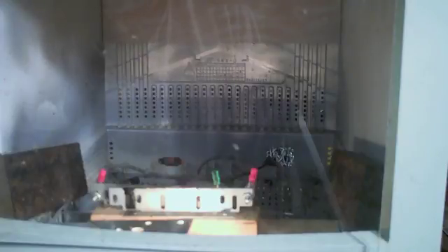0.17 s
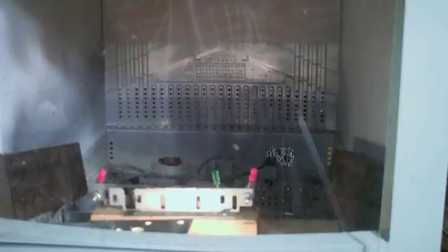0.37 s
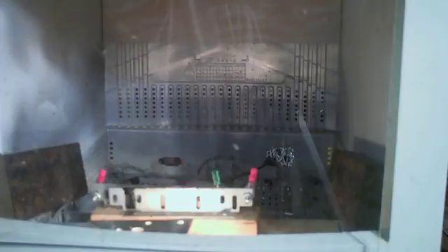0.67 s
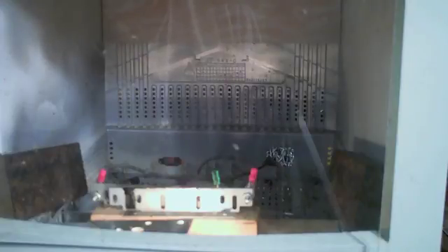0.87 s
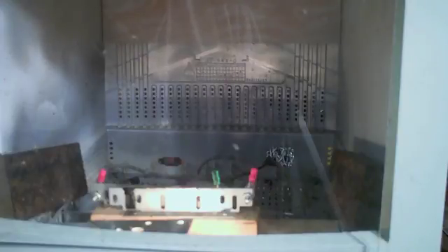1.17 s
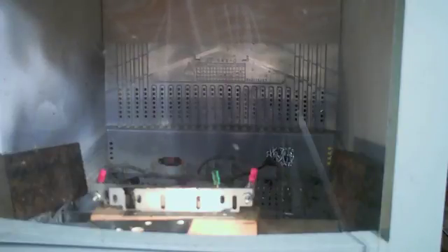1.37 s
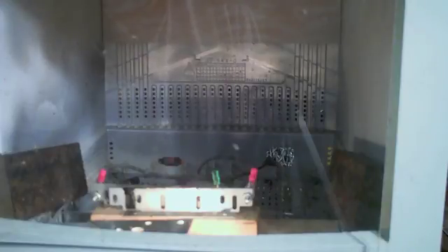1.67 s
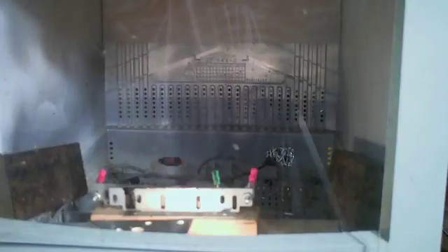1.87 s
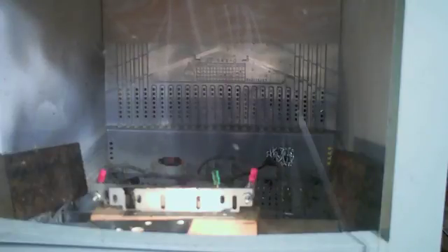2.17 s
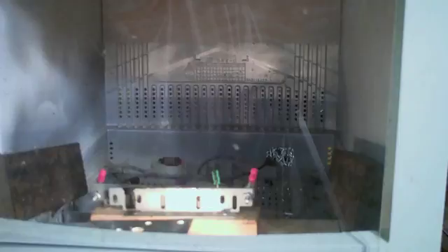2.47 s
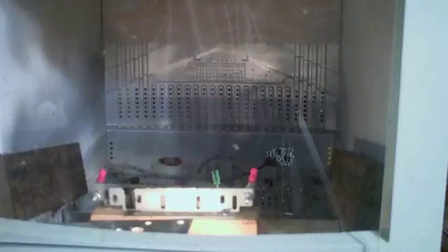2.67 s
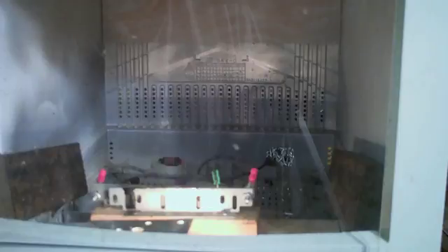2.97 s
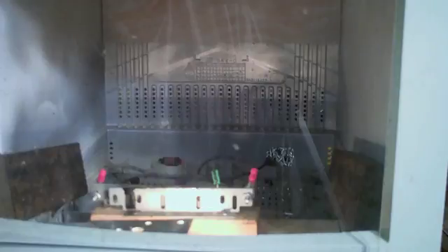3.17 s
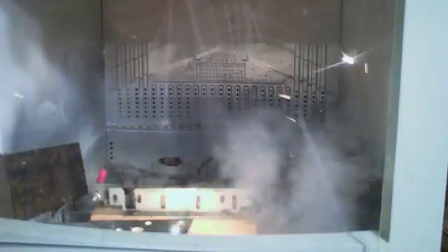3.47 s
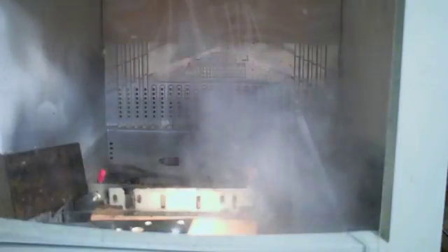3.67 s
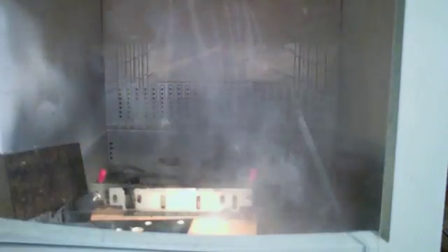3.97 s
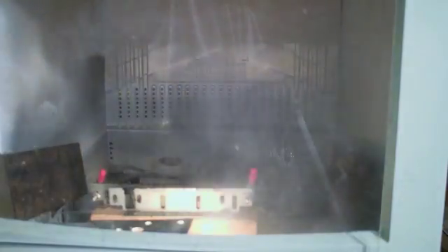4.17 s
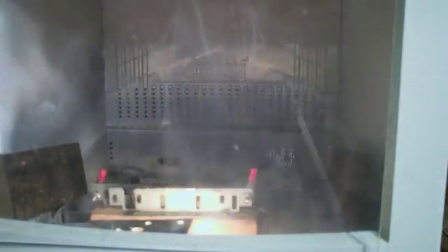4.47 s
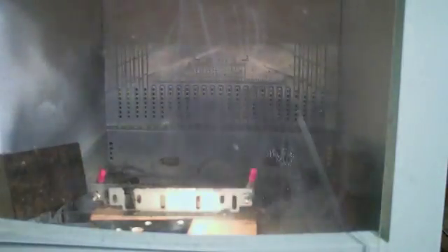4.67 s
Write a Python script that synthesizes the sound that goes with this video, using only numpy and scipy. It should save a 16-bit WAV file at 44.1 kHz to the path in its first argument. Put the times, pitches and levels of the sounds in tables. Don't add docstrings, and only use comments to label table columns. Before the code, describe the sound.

From 0 to 3.37 seconds there is only a quiet, steady background: low mains hum, two fan shafts beating slowly against each other, a faint unsteady motor whine and soft, dull air rush. At about 3.38 seconds, after a few milliseconds of rattle through the metal, a small capacitor bursts with one very loud, sharp crack that softly overloads the microphone. Rapid gas puffs merge into it, sheet-metal panels ring, and the door thuds back hard at 3.42. The boxy reverberation dies within about a third of a second, with a fainter workshop tail. A thin shard pings high near 3.48; from 3.65 to 3.8 fragments clink on a metal tray and the empty can drops and skitters on the bench. A very faint fizz swells around 4.2 and fades, while a loose clip ticks lightly from 4.15 to 4.4. The hum and airflow then continue alone until 5 seconds.

```python
import sys
import numpy as np
from scipy import signal
from scipy.fft import rfft, irfft, next_fast_len
from scipy.io import wavfile
from scipy.ndimage import uniform_filter1d

SR = 44100
rng = np.random.default_rng(int(sys.argv[2]) if len(sys.argv) > 2 else 0)


def int16_out(signal):
    q = np.round(np.clip(np.atleast_2d(signal).T, -1, 1) * 32767)
    wavfile.write(sys.argv[1], SR, q.astype(np.int16))


def magnitude_from_level(level_db):
    exponent = np.asarray(level_db, float) / 20
    return 10 ** exponent


N = 212804
TIME = np.arange(N) / SR
BLAST = TIME[int(3.3 * SR):int(4.1 * SR)]
SHAFT_HZ, SHOCK_S = 29.545, 3.3781


def level(x, db):
    return x * magnitude_from_level(db) / np.sqrt(np.mean(x ** 2))


def shape(x, gain):
    size = next_fast_len(len(x))
    hz = np.maximum(np.arange(size // 2 + 1) * SR / size, 1)
    return irfft(rfft(x, size) * gain(hz), size)[:len(x)]


def low_cut(x):
    return shape(x, lambda hz: 1 / (1 + (230 / hz) ** 4))


def on_log(points, hz):
    f, v = np.transpose(points)
    return np.interp(np.log(hz), np.log(f), v)


def walk(rate_hz):
    k = int(SR / rate_hz)
    steps = np.repeat(rng.standard_normal(N // k + 1), k)
    smooth = uniform_filter1d(uniform_filter1d(steps, k), k)
    return level(smooth[:N], 0)


def ring(modes, start_rad=0):
    hz, db, t60_s = np.transpose(modes)[:, :, None]
    t = TIME[:SR // 3]
    return np.sum(magnitude_from_level(db - 60 * t / t60_s) * np.sin(2 * np.pi * hz * t + start_rad), axis=0)


def reverb(scale=1):
    # pitch_hz, t60_s
    box_t60 = [(100, .15), (250, 0.23), (700, 0.3), (1400, 0.29), (3000, .255), (6000, 0.21), (12000, .185),
               (14800, .05)]
    t, out = TIME[:SR // 2], 0
    noise = rng.standard_normal(len(t))
    for centre in 60 * 2 ** np.arange(0, 8.6, .5):
        band = shape(noise, lambda hz: np.cos(np.pi * np.clip(np.log2(hz / centre), -.5, .5)) ** 2)
        t60_s = scale * on_log(box_t60, centre)
        out = out + band * magnitude_from_level(-60 * t / t60_s) * np.sqrt(2 * np.log(1000) / t60_s / SR)
    return out


def hum():
    # mains_order, shaft1_order, shaft2_order, level_db (rms)
    tones = [(0, 1, 0, -50.4), (0, 0, 1, -55.7), (0, 3, 0, -71), (2, 0, 0, -44.1), (2, 1, 0, -65),
             (2, 2, 0, -65), (4, -1, 0, -68), (4, 0, 0, -49.5), (4, 0, 1, -61), (6, 0, 0, -65.5),
             (10, 0, 0, -69)]
    mains_hz, shaft2_hz, beat_peak_s = 59.988, 28.225, 1.715
    t, sway = TIME - beat_peak_s, walk(0.86)
    out = 0
    for m, a, b, db in tones:
        hz = m * mains_hz + a * SHAFT_HZ + b * shaft2_hz
        lead_rad = np.pi / 4 * max(m - 2, 0)
        out = out + magnitude_from_level(db + 0.12 * sway) * np.sqrt(2) * np.cos(2 * np.pi * hz * t + lead_rad)
    return out


def air_rush():
    # pitch_hz, density_db (per Hz)
    air = [(15, -14.5), (45, -22), (75, -18.5), (100, -17), (200, -14), (300, -14), (453, -16.5),
           (881, -21), (1500, -24), (2250, -37.5), (4200, -44), (5500, -51), (12700, -62.5), (13000, -83.5)]
    rush, swell = 0, walk(0.68)
    for centre in 20 * 2 ** np.arange(0, 10):
        def octave(hz):
            return magnitude_from_level(on_log(air, hz)) * np.cos(np.pi / 2 * np.clip(np.log2(hz / centre), -1, 1))
        band = shape(rng.standard_normal(N), octave)
        rush = rush + band * magnitude_from_level(.35 * swell + .6 * walk(12))
    return level(rush, -52.5)


def whine():
    # pitch_hz, width_hz, level_db (rms)
    blades = [(288, 11, -60), (308, 8, -61), (340.2, 40, -63.5), (348.6, 6.6, -67), (390, 6.5, -66),
              (409, 14, -66), (491, 3, -67), (590, 3, -66), (605, 17, -62.5), (635.6, 4, -66),
              (727, 50, -66), (1280, 16, -68.5), (1280, 170, -69), (3910, 160, -84.5), (11800, 160, -97)]

    def peaks(hz):
        power = 0
        for f, w, db in blades:
            power = power + magnitude_from_level(db) ** 2 * 2 * SR / (np.pi * w) / (1 + (2 * (hz - f) / w) ** 2) ** 2
        return np.sqrt(power)
    return shape(rng.standard_normal(N), peaks)


def rotor_slots():
    # centre_hz, level_db (rms)
    slots = [(3941.5, -91), (11823, -97)]
    # pitch_hz, level_db (rms)
    coils = [(2702, -90), (7882, -98), (8348, -104)]
    outer_db = -6
    lines = list(coils)
    for hz, db in slots:
        for k in np.arange(4) - 1.5:
            lines.append((hz + k * SHAFT_HZ, db + (abs(k) > 1) * outer_db))
    clock_s = TIME + np.cumsum(0.00027 * walk(18)) / SR
    return sum(magnitude_from_level(db + 1.2 * walk(15)) * np.sqrt(2) * np.cos(2 * np.pi * hz * clock_s) for hz, db in lines)


def smoke():
    start_s, peak_s, hold_s = 3.6, 4.2, .17
    peak_db, rest_db, rise_db_s, fall_db_s = -66, -80, 45, 90

    def colour(hz):
        return (1 / (1 + (np.log2(hz / 1700) / 0.75) ** 4) + .075) / (1 + (hz / 11000) ** 8)
    fizz = level(shape(rng.standard_normal(N), colour), 0)
    before_db = rise_db_s * (peak_s - TIME)
    after_db = fall_db_s * (TIME - peak_s - hold_s)
    swell_db = peak_db - np.maximum(0, np.maximum(before_db, after_db))
    flutter_db = 1.2 * walk(25)
    return fizz * (TIME > start_s) * magnitude_from_level(np.maximum(swell_db, rest_db) + flutter_db)


def debris(landings, modes, crack_db, crack_hz, octaves, contact_s, tail, uneven_rad):
    def crack(hz):
        return 1 / (1 + (np.log2(hz / crack_hz) / octaves) ** 4) / (1 + (hz / 12800) ** 20)
    out = np.zeros(N + SR)
    echo = shape(reverb(tail), crack)
    t = TIME[:SR // 3]
    for s, db, hold_s in landings:
        response = ring(modes, uneven_rad * rng.standard_normal((len(modes), 1)))
        build_up = 1 - np.exp(-t / contact_s)
        damping = np.exp(-np.clip(t - hold_s, 0, None) / 0.0058)
        at = int(s * SR)
        out[at:at + len(t)] += magnitude_from_level(db) * (response * build_up * damping + magnitude_from_level(crack_db) * echo[:len(t)])
    return out[:N]


def held(hits, hold_s):
    return [(s, db, hold_s) for s, db in hits]


def loose_clip():
    # pitch_hz, level_db, t60_s
    clip_modes = [(4280, 2, 0.065), (4350, 0.5, .1), (4470, -3, .06), (1600, 0, 0.055), (2800, -7, .06),
                  (8900, -18, 0.0196)]
    # start_s, level_db
    rattles = [(4.15, -72), (4.199, -62), (4.235, -61), (4.250, -58), (4.297, -68), (4.334, -64),
               (4.38, -71)]
    return debris(held(rattles, .008), clip_modes, crack_db=11, crack_hz=6700, octaves=0.66,
                  contact_s=.0015, tail=.15, uneven_rad=.3)


def bench():
    # pitch_hz, level_db, t60_s
    bench_modes = [(2460, -7, .05), (3140, -3, .04), (4070, 0, .06), (4190, -3, .08)]
    # start_s, level_db
    skitters = [
        (3.660, -50),
        (3.667, -55),
        (3.69, -64),
        (3.715, -67),
    ]
    # start_s, level_db
    pings = [(3.650, -60), (3.764, -60)]
    can = debris(held(skitters, .1), bench_modes, crack_db=47, crack_hz=1450, octaves=1.03,
                 contact_s=.0005, tail=0.55, uneven_rad=1.0)
    bits = debris(held(pings, .025), bench_modes, crack_db=14, crack_hz=3000, octaves=1.22,
                  contact_s=.0005, tail=0.3, uneven_rad=1.0)
    return can + bits


def tray():
    # pitch_hz, level_db, t60_s
    tray_modes = [(1126, -12, .3), (1156, 0, .36), (1187, -4, .3), (1215, -10, .2), (2620, -24, .2)]
    # start_s, level_db, hold_s (until damped)
    hits = [(3.651, -36, .065), (3.731, -51, .014), (3.764, -42, .027), (3.798, -43.5, .029)]
    return debris(hits, tray_modes, crack_db=10, crack_hz=2000, octaves=0.98,
                  contact_s=.003, tail=0.64, uneven_rad=0.41)


def shard():
    # pitch_hz, level_db, t60_s
    shard_modes = [(4390, -5, .12), (4430, 2, .12), (5100, -3, .2), (5160, -6, .15), (8700, -12, .05),
                   (10700, -16, .1), (11620, -1, .05)]
    # start_s, level_db, hold_s (until damped)
    hits = [(3.479, -41, .08)]
    return debris(hits, shard_modes, crack_db=15, crack_hz=6000, octaves=1.1,
                  contact_s=0.00083, tail=.6, uneven_rad=.8)


def heave():
    # pitch_hz, level_db, t60_s
    air_modes = [(82, -6, .15), (150, 0, .15)]
    # start_s, level_db, hold_s (until damped)
    pushes = [(3.384, -21, .034)]
    return debris(pushes, air_modes, crack_db=-40, crack_hz=450, octaves=1.1,
                  contact_s=.015, tail=0.6, uneven_rad=0.4)


def door():
    # pitch_hz, level_db, t60_s
    door_modes = [(266, 3.5, .16), (288.2, -2, 0.15), (710, -5, 0.13)]
    # start_s, level_db, hold_s (until damped)
    knocks = [
        (3.378, -20, .044),
        (3.422, -13, .021),
        (3.447, -25.5, .028),
        (3.490, -31.5, .02),
    ]
    return debris(knocks, door_modes, crack_db=-12, crack_hz=450, octaves=1.1,
                  contact_s=.004, tail=0.62, uneven_rad=0.43)


def forerunner():
    start_s, peak_db = 3.3732, -22
    u = np.clip((TIME - start_s) / (SHOCK_S - start_s), 0, 1)
    rattle = shape(rng.standard_normal(N), lambda hz: 1 / np.sqrt(1 + (hz / 4000) ** 2))
    rising_tone = 1.2 * np.sin(2 * np.pi * u ** 1.4)
    return low_cut(magnitude_from_level(peak_db) * u * (u < 1) * (rattle + rising_tone))


def shock_front():
    length_s, peak_db = 0.0014, 2
    u = (BLAST - SHOCK_S) / length_s
    return low_cut(magnitude_from_level(peak_db) * np.where((u > 0) & (u < 1), np.sin(2 * np.pi * u), 0))


def gas_and_thuds():
    # start_s, level_db
    thuds = [(3.421, -14), (3.507, -37.5)]
    gusts, first_s, gap_s, first_db, drop_db = 3, 3.3791, .011, -10, 2.5
    # start_s, level_db, length_s, bright_hz
    puffs = [(first_s + k * gap_s, first_db - k * drop_db, .011, 11000) for k in range(gusts)]
    puffs += [(s, db, .0064, 1300) for s, db in thuds]
    gas = 0
    for s, db, length_s, bright_hz in puffs:
        u = np.clip((BLAST - s) / length_s, 0, None)
        noise = shape(rng.standard_normal(len(u)), lambda hz: 1 / np.sqrt(1 + (hz / bright_hz) ** 2))
        gas = gas + magnitude_from_level(db) * (u > 0) * np.exp(-u) * noise
    return gas


def bang():
    # pitch_hz, density_db (per Hz)
    colour = [(70, -24.5), (200, -26), (273, -6), (466, -12), (650, -2.5), (983, -1), (1400, -4),
              (2100, -13.5), (3890, -9), (4800, -17), (6500, -15.5), (10100, -22), (13000, -25),
              (15700, -43.5)]
    # pitch_hz, level_db, t60_s
    panel_modes = [(425, -1.5, .15), (594, -8, .12), (700.6, 2, .12), (890, -5, .12), (970, -6, 0.31),
                   (1040, -5, .15), (1197, -1.5, 0.13), (1300, 1, 0.28), (1450, -10, .15),
                   (1750, -11, 0.071), (2940, -16.5, 0.16), (3180, -11, .15), (3940, -18.5, .15)]
    dull_hz, top_hz = 2200, 13000

    def muffle(hz):
        return (.45 + .55 / (1 + (hz / dull_hz) ** 4)) / (1 + (hz / top_hz) ** 30)
    shock, gas = shock_front(), gas_and_thuds()
    workshop = shape(reverb(1.9), muffle)
    tail = magnitude_from_level(4.5) * reverb() + magnitude_from_level(-17) * workshop
    filled = magnitude_from_level(7) * gas + signal.fftconvolve(gas, tail)[:len(BLAST)]
    coloured = shape(filled, lambda hz: magnitude_from_level(on_log(colour, hz) + 12))
    drive = gas + magnitude_from_level(-12.5) * shock
    panels = signal.fftconvolve(drive, magnitude_from_level(-39) * ring(panel_modes))[:len(BLAST)]
    return np.interp(TIME, BLAST, shock + coloured + panels, 0, 0)


def scene():
    machines = hum() + air_rush() + whine() + rotor_slots()
    fragments = loose_clip() + bench() + tray() + shard()
    burst = heave() + door() + forerunner() + bang()
    return (machines + smoke() + fragments + burst)[None]


def low_pass(x):
    return signal.sosfilt(signal.butter(12, 15880, fs=SR, output="sos"), x)


def record(dry):
    ceiling, notch_hz, notch_width_hz, top_hz = .76, 7780, 310, 15700
    squashed = ceiling * np.tanh(dry[0] / ceiling)
    notched = signal.lfilter(*signal.iirnotch(notch_hz, notch_hz / notch_width_hz, SR), squashed)
    dipped = .1 * squashed + .9 * notched
    mix = shape(dipped, lambda hz: 1 / (1 + (hz / top_hz) ** 80))
    return low_pass(mix[None])


dry = scene()
out = record(dry)
int16_out(out)
```